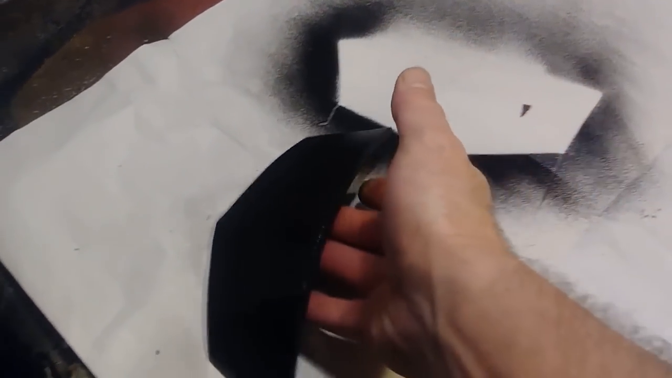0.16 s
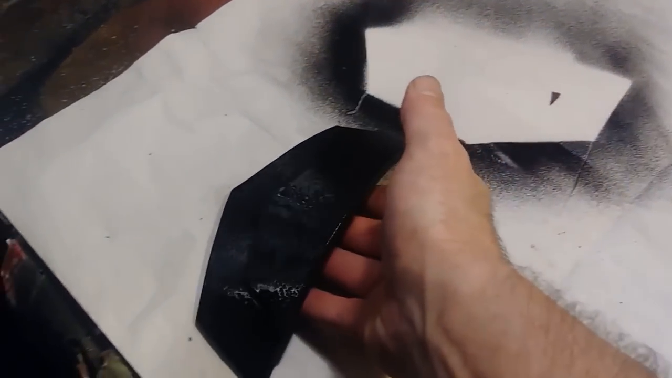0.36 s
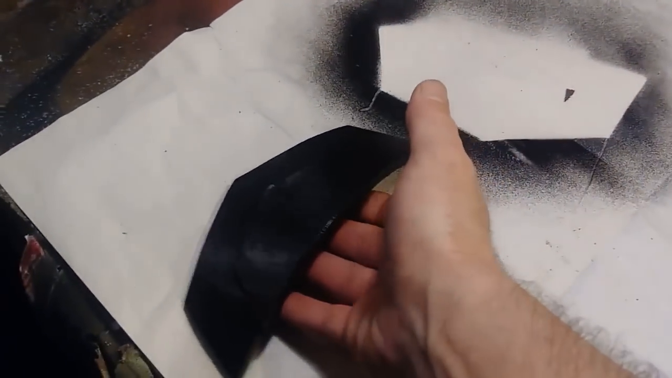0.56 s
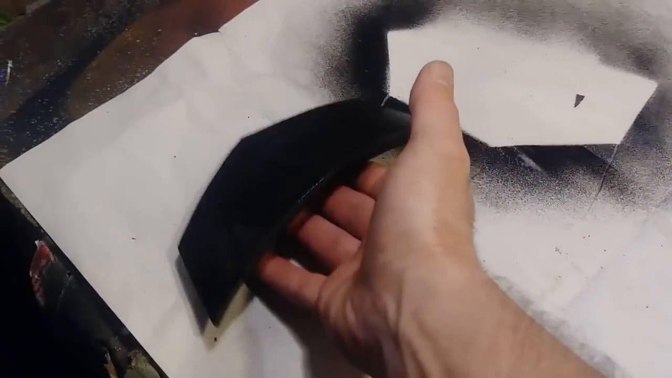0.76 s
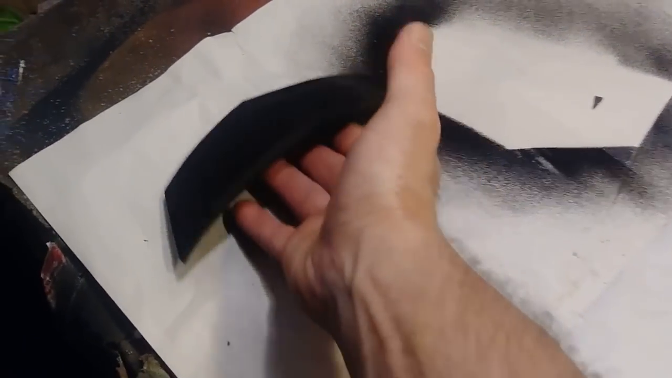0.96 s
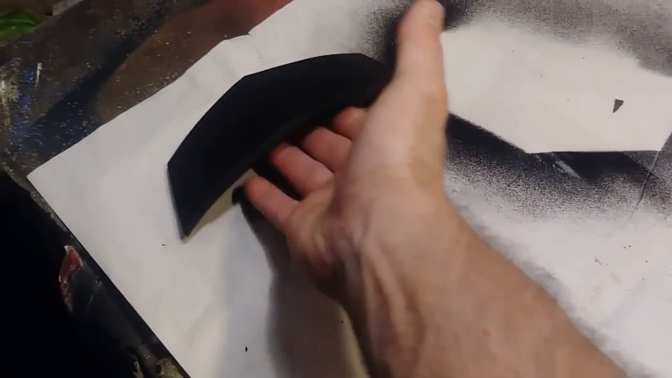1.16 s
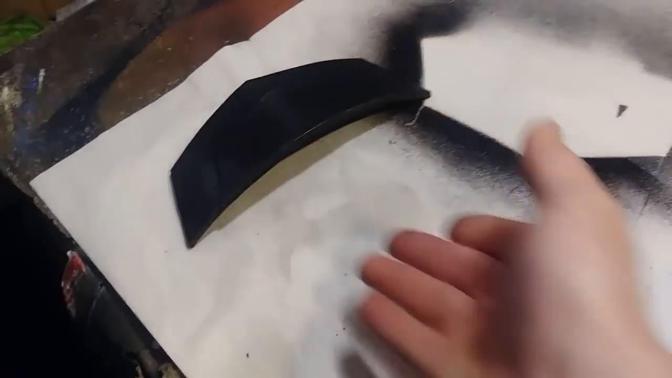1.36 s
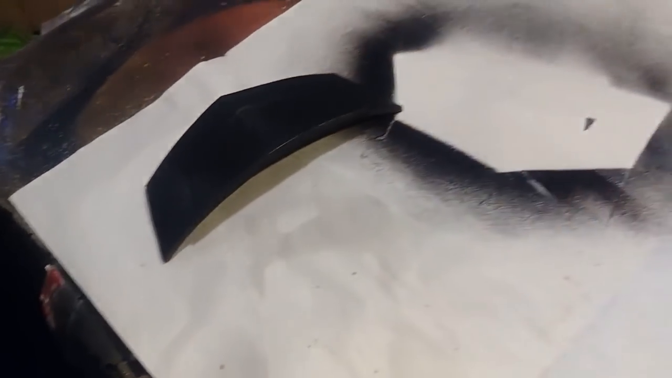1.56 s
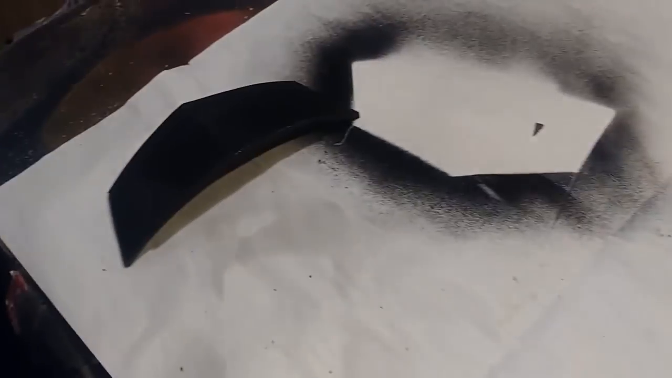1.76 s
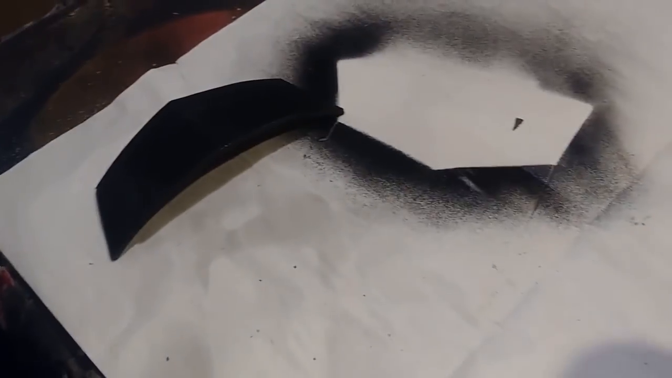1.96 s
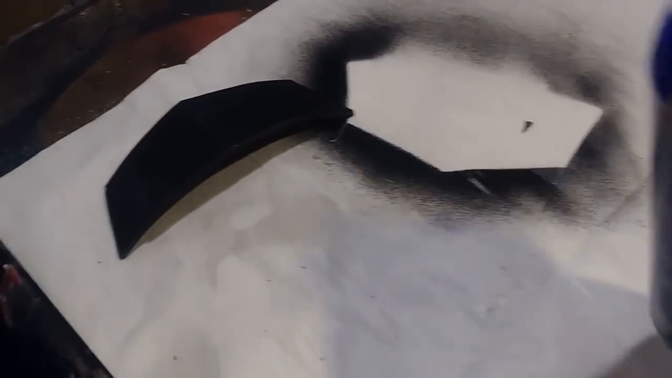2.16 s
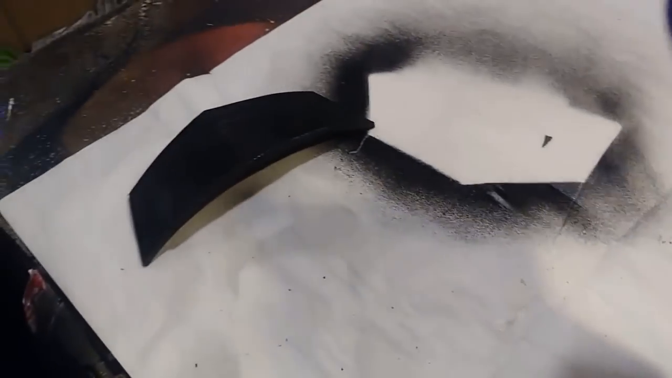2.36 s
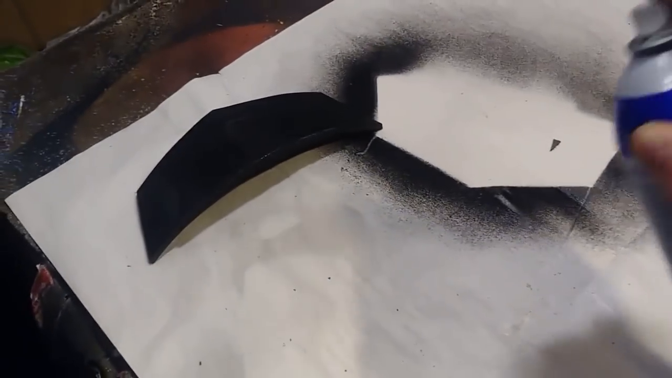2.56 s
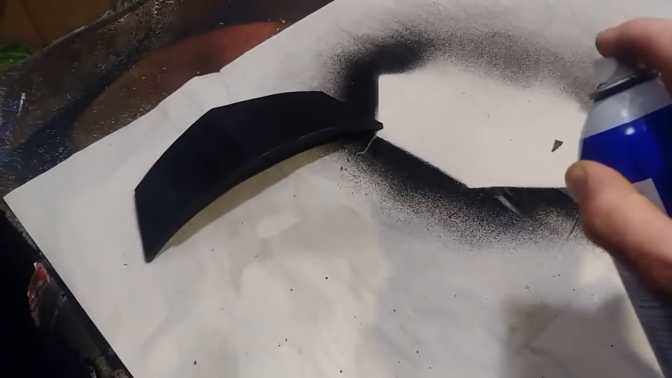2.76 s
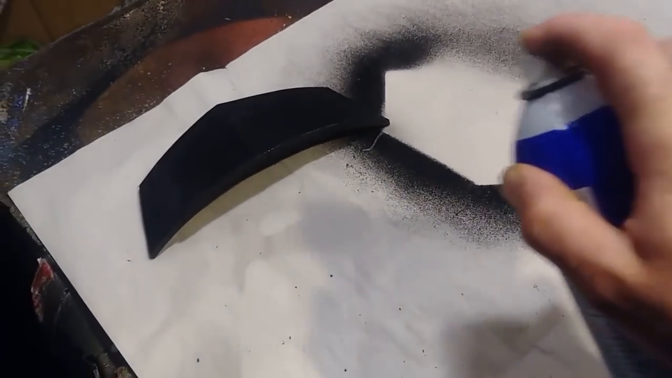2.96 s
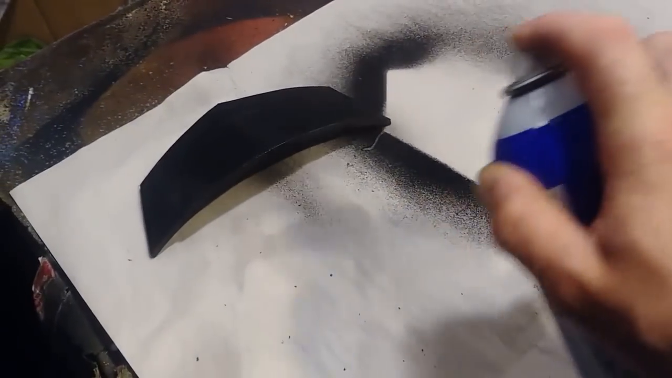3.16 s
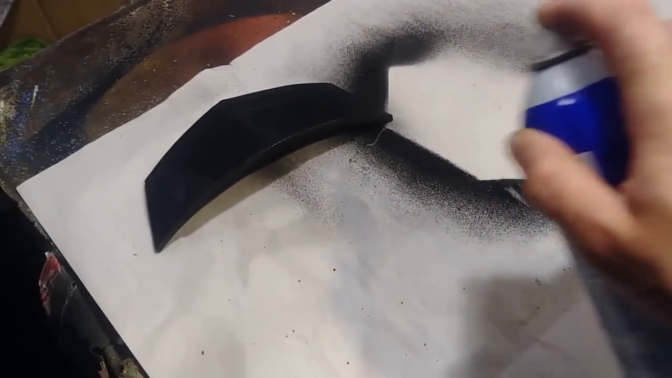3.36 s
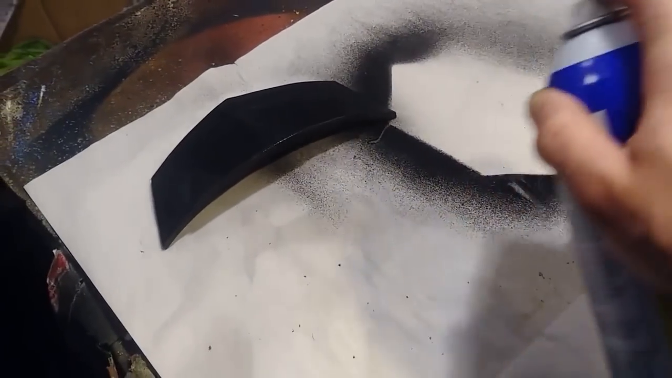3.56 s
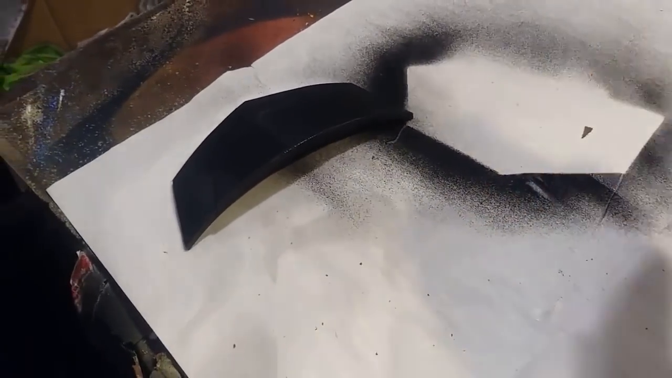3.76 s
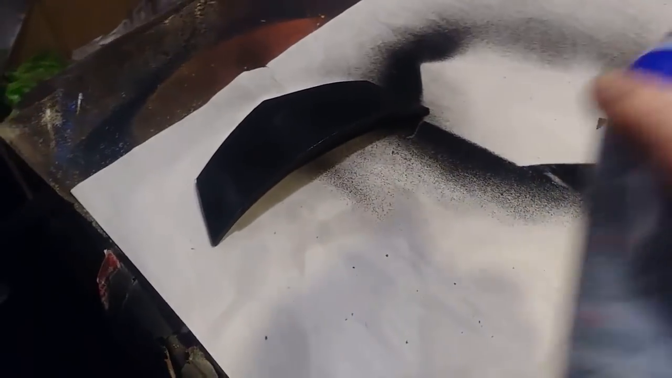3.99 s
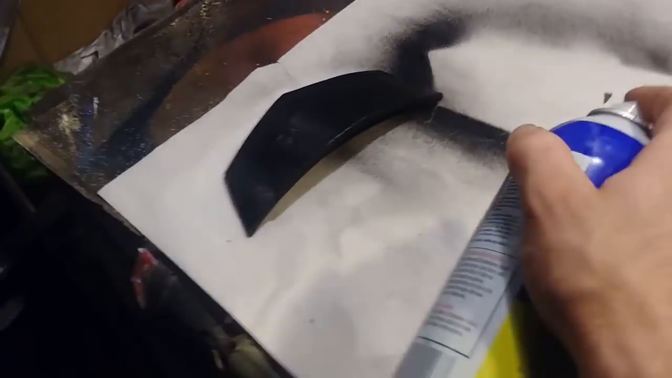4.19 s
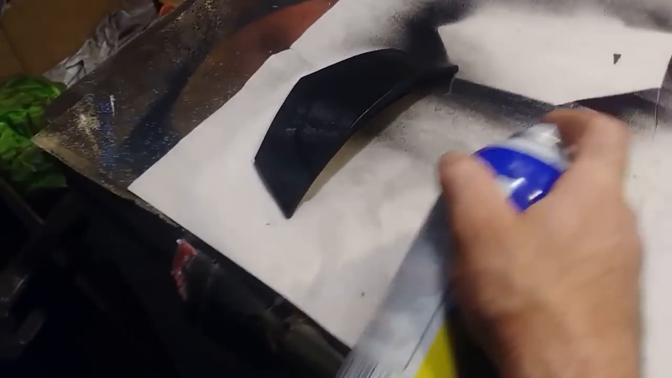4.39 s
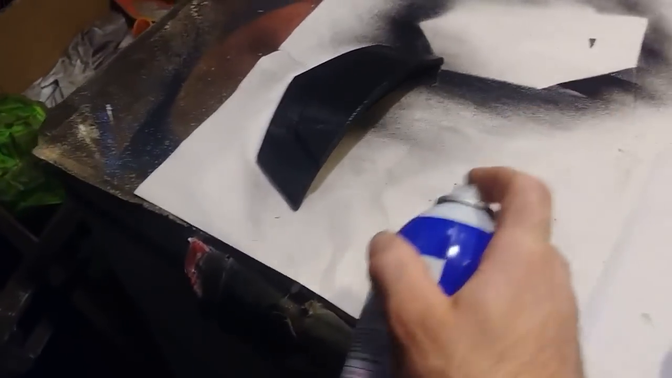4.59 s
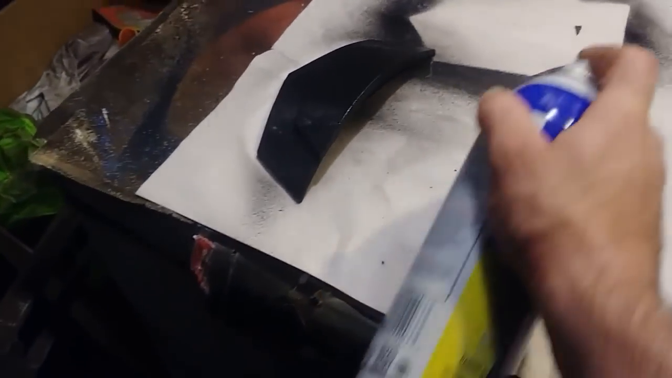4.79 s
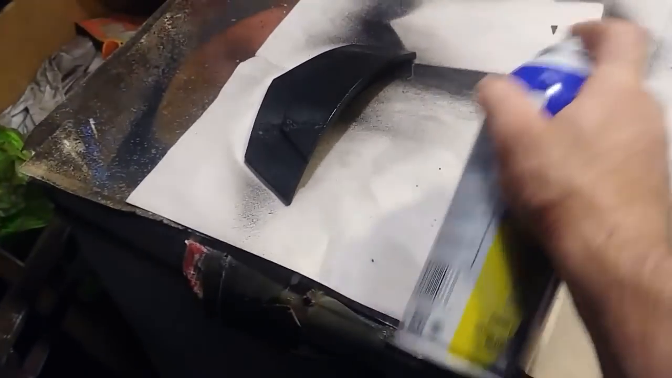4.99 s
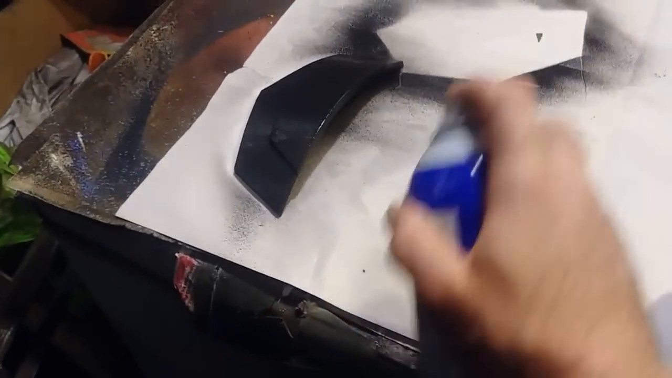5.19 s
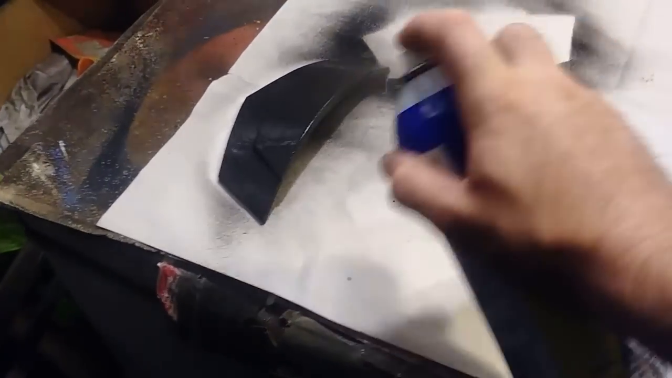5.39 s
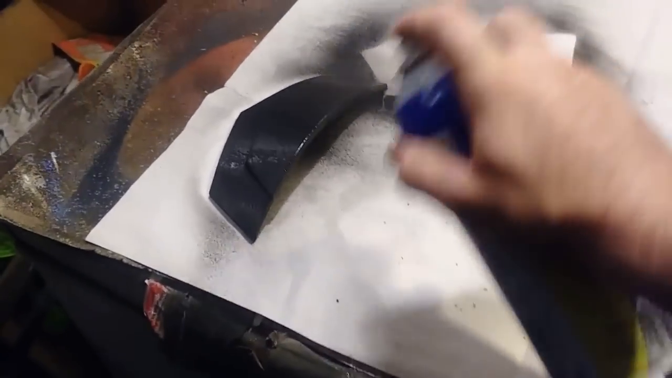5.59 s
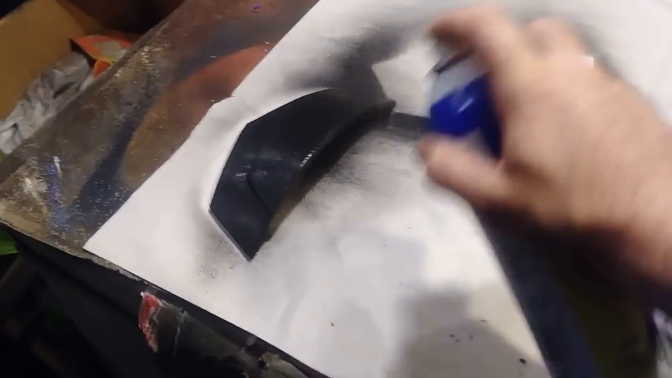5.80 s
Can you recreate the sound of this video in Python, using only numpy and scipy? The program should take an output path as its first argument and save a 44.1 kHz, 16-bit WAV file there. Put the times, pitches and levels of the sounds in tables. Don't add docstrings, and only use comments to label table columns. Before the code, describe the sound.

Foam piece rubs and settles on paper, a spray can is picked up, hisses in two bursts, its mixing ball clacking loudly between and during them.

```python
import sys
import numpy as np
from scipy import signal
from scipy.fft import rfft, irfft
from scipy.io import wavfile
from scipy.ndimage import uniform_filter1d

SR = 44100
rng = np.random.default_rng(int(sys.argv[2]) if len(sys.argv) > 2 else 0)


def waveform_to_disk(signal):
    frames = np.transpose(np.atleast_2d(signal))
    scaled = np.clip(frames, -1, 1) * 32767
    samples = np.round(scaled).astype(np.int16)
    wavfile.write(sys.argv[1], SR, samples)


def magnitude_from_level(level_db):
    exponent = np.asarray(level_db, float) / 20
    return 10 ** exponent


N = 257544
FRAME, HOP = 512, 128
HZ = np.fft.rfftfreq(FRAME, 1 / SR)[:, None]


def evened(x):
    return x / np.sqrt(np.mean(abs(x) ** 2) + 1e-20)


def evened_level(db):
    return np.sqrt(np.mean(magnitude_from_level(db) ** 2))


def read(points, hz):
    f, value = np.transpose(points)
    return np.interp(np.log(hz + 1), np.log(f + 1), value)


def add(mix, s, sound):
    part = mix[round(s * SR):][:len(sound)]
    part += sound[:len(part)]


def resonate(x, hz, width):
    r = np.exp(-np.pi * width / SR + 2j * np.pi * hz / SR)
    return 2 * signal.lfilter([1 - abs(r)], [1, -r], x).real


def controls(rows):
    s, *columns = np.transpose(rows)
    t = np.arange(s[0], s[-1] + HOP / SR, HOP / SR)
    return s[0], [np.interp(t, s, c) for c in columns]


def shaped(source, gain):
    z = signal.stft(source, nperseg=FRAME, noverlap=FRAME - HOP)[2][:, :gain.shape[1]]
    return signal.istft(z * gain, nperseg=FRAME, noverlap=FRAME - HOP)[1]


def patches(frames, wide, long):
    field = rng.standard_normal((frames, len(HZ))).T
    return evened(uniform_filter1d(uniform_filter1d(field, wide, 0), long, 1))


def shelf(hz, octaves):
    return .5 + .5 * np.tanh(np.log2((HZ + 1) / hz) / octaves)


def bump(hz, width):
    return 1 / (1 + ((HZ - hz) / width) ** 2)


def grainy(n, per_s, spread_db, share):
    size = magnitude_from_level(spread_db * np.minimum(rng.exponential(1, n), 4))
    clicks = size * (rng.random(n) < per_s / SR) * rng.choice([-1, 1], n)
    return evened((1 - share) * rng.standard_normal(n) + share * evened(clicks))


def burst(t60, edge):
    t = np.arange(round(.3 * SR)) / SR
    return (rng.standard_normal(len(t)) + edge * (t == 0)) * magnitude_from_level(-60 * t / t60)


def valve_press(opened, shut, away_db, hand):
    after_s = 0.74
    t = np.arange(opened, min(shut + after_s, N / SR + .03), .004)
    s, flow_db, turn = np.transpose(hand)
    turn = np.interp(t, s, turn)
    closed = np.clip((t - shut) / 0.031, 0, 1)
    after = np.maximum(t - shut, 0)
    flow_db = np.interp(t, s, flow_db) - 14 * np.clip(1 - (t - opened) / .028, 0, 1)
    flow_db = flow_db - 13 * closed - 3 * after - 64 * after ** 2
    fizz_db = -12 + 16 * turn - 8 * closed - 36 * after
    reach_s = 0.42
    away = np.clip(2 - 2 * (t - opened) / reach_s, 0, 1)
    roar_db = -14.5 - turn + 8 * closed + away_db * away
    nozzle_hz = 4640 - 170 * (t - opened)
    return np.transpose([t, flow_db, fizz_db, roar_db, nozzle_hz])


def jet(rows, can_db, flutter_db):
    # pitch_hz, level_db (per Hz)
    jet_colour = [(150, -43), (250, -30.5), (319, -33.5), (451, -14.5), (1000, -11), (2120, -3.5),
                  (2390, -6), (2750, -3), (4400, -3), (6110, -16), (7530, -14.5), (12000, -26),
                  (15100, -25.5), (15900, -26)]
    # time_s, delay_ms
    detour = [(2.9, 0.57), (3.2, 0.94), (3.5, 1), (3.75, 0.55), (4.3, 0.57), (4.55, 0.52), (5.1, 0.53),
              (5.45, 0.6), (5.84, 0.7)]
    s, (flow_db, fizz_db, roar_db, nozzle_hz) = controls(rows)
    frames = len(flow_db)
    colour_db = read(jet_colour, HZ) + (fizz_db + 9) * shelf(4170, 0.78)
    colour_db = colour_db + (roar_db + 16.5) * (1 - shelf(1760, 0.11))
    colour_db = colour_db + 0.78 * bump(nozzle_hz, 146)
    colour_db = colour_db + can_db * bump(2170, 210) + flutter_db * bump(375, 58)
    colour_db = colour_db + 3.0 * patches(frames, 2, 26) + 0.86 * patches(frames, 120, 3)
    delay = np.interp(s + np.arange(frames) * HOP / SR, *np.transpose(detour)) / 1000
    near_echo = .2 * np.exp(2j * np.pi * HZ * delay)
    far_echo = .25 * np.exp(2j * np.pi * HZ * (delay + .0023))
    gain = magnitude_from_level(colour_db) * abs(1 + near_echo + far_echo) / evened_level(read(jet_colour, HZ))
    droplets = grainy(frames * HOP, 6000, 0.8, 0.45)
    hiss = shaped(droplets, gain)
    flow = magnitude_from_level(np.interp(np.arange(len(hiss)) / HOP, np.arange(frames), flow_db))
    return s, hiss * flow * signal.windows.tukey(len(hiss), .006)


def spray_bursts(mix):
    # open_s, shut_s, can_ring_db, paper_flutter_db, roar_before_paper_db
    presses = [
        (2.886, 3.778, 4, -2.5, 0.5),
        (4.289, 5.9, 7.5, 12.5, -3.5),
    ]
    # time_s, valve_flow_db, nozzle_turn (-1..1, to the microphone)
    hands = [
        [(2.9, -38, 0.38), (2.96, -36, 0.23), (3.13, -37, 0.12), (3.17, -37, 0.64), (3.4, -35.5, 0.26),
         (3.56, -35.5, 0.33), (3.77, -37, 0.33)],
        [(4.3, -40.5, 0.49), (4.38, -38, 0.45), (4.53, -42, .9), (4.62, -36.5, 0.21), (4.72, -38, 0.43),
         (4.95, -40, 0.57), (5.25, -41, 0.72), (5.45, -39, 0.31), (5.84, -38, 0.54)],
    ]
    for (opened, shut, can_db, flutter_db, away_db), hand in zip(presses, hands):
        add(mix, *jet(valve_press(opened, shut, away_db, hand), can_db, flutter_db))


def nozzle_whistles(mix):
    # start_s, length_s, pitch_hz, level_db
    whistles = [
        (2.9, 0.064, 4450, -33),
        (3.15, 0.046, 4050, -35.5),
        (3.2, 0.038, 3800, -43),
    ]
    for s, length, hz, db in whistles:
        n = round(length * SR)
        tone = evened(resonate(rng.standard_normal(n), hz, 70))
        add(mix, s, magnitude_from_level(db) * tone * np.hanning(n))


def clack(s, db, hz, low_db, high_db, t60, crack_t60, rattle_db):
    # pitch_hz, level_db (per Hz)
    crack_colour = [(120, -11), (200, -14.5), (531, -8.5), (1020, 0), (1540, -3), (2280, -3.5),
                    (5740, -19.5), (7560, -92), (9600, -14.5), (12000, -83), (15600, -78), (22000, -120)]
    # pitch_multiple, width_hz, level_db
    low_ring = [(0.878, 117, -6.5), (1.002, 78, -1), (1.2, 200, -2)]
    # pitch_hz, width_hz, level_db
    high_ring = [(3470, 336, -1.5), (4600, 690, -1.5), (6160, 190, -18.5), (7820, 480, -18.5)]
    colour_db = 2 * read(crack_colour, HZ) + (high_db - 14) * shelf(6200, .2) - 22 * (1 - shelf(1050, .4))
    taps = signal.minimum_phase(signal.firwin2(511, HZ[:, 0], magnitude_from_level(colour_db)[:, 0], fs=SR))
    hit = burst(crack_t60, edge=9) + magnitude_from_level(rattle_db) * burst(t60, edge=9)
    crack = np.convolve(hit, taps)[:-len(taps) + 1]
    sound = crack / abs(crack).max()
    modes = [(k * hz, w, d + low_db) for k, w, d in low_ring]
    modes += [(f, w, d + high_db) for f, w, d in high_ring]
    for f, width, mode_db in modes:
        ring = burst(t60, edge=20.3)
        for spread in (1, 4, 8):
            ring = resonate(ring, f, spread * width)
        sound = sound + magnitude_from_level(mode_db) * ring / abs(ring).max()
    return s + .0007, magnitude_from_level(db) * sound


def ball_clacks(mix):
    # start_s, peak_db, low_ring_hz, low_ring_db, high_ring_db
    loose = [(2.286, -43, 2170, -9.5, -31), (2.3212, -29.5, 2020, -9.5, -7.5), (2.34, -32, 2280, -17, -30),
             (2.4318, -47, 2180, -26, -2.5), (2.5575, -22.5, 2140, -12.5, -13.5),
             (2.5975, -41, 2130, -19, -35), (3.8992, -38.5, 2150, -1.5, -3),
             (4.1938, -37.5, 2200, -6.5, -51), (4.2444, -83, 2090, -3, -27)]
    # start_s, peak_db, low_ring_hz, low_ring_db, high_ring_db
    swung = [(4.584, -30.5, 2180, -0.5, -2), (4.6044, -11, 2315, -13.5, -7),
             (5.2616, -4.5, 2290, -6.5, -3.5), (5.3352, -22.5, 1850, -4.5, -16),
             (5.365, -41, 2170, -13, -12), (5.4501, -24, 2060, 7, 6), (5.4658, -19, 1825, -5, -1.5),
             (5.4791, -11, 1855, -13.5, -7), (5.544, -6.5, 2286, -6.5, -2.5),
             (5.5743, -19.5, 2070, -4, -26), (5.6309, -9, 1996, -2.5, -6), (5.6878, -13, 1870, -6.5, -6),
             (5.7157, -11.5, 2063, -9, -8.5), (5.791, -9.5, 2220, -8, -1.5), (5.82, -10.5, 1920, -4, -12)]
    for row in loose:
        add(mix, *clack(*row, t60=.238, crack_t60=.03, rattle_db=1))
    for row in swung:
        add(mix, *clack(*row, t60=.073, crack_t60=.014, rattle_db=-17))


def ball_rolls(mix):
    # peak_s, level_db, pitch_hz
    rolls = [(2.232, -62, 2180), (2.326, -31.5, 2150), (2.4, -61, 2060), (2.5, -45.5, 1990),
             (2.59, -50, 2110), (2.66, -51, 2110), (2.771, -48, 1910)]
    rise_s, fall_s, ends_db = .02, 0.12, -24
    for at, peak_db, hz in rolls:
        swell = [(at - rise_s, peak_db + ends_db / 2), (at, peak_db), (at + fall_s, peak_db + ends_db)]
        s, (db,) = controls(swell)
        gain = magnitude_from_level(db + 12.5) * bump(hz, 160) ** 2 * signal.windows.tukey(len(db), .2)
        add(mix, s, shaped(grainy(len(db) * HOP, 630, 3., 0.53), gain))


def stroke(s, length, db, bright_db, dull_db):
    end, lift_s, settle_s = s + length, 0.006, 0.167
    shape = [(s, -11), (s + .3 * length, 0), (end, 0), (end + lift_s, -8), (end + lift_s + settle_s, -37)]
    return [(t, db + d, bright_db, dull_db) for t, d in shape]


def rub(rows):
    # pitch_hz, level_db (per Hz)
    paper_colour = [(180, -65), (300, -108), (457, 12), (719, -15), (1050, 4), (1400, -9.5), (2000, -16),
                    (4730, -19), (8910, -39.5), (11000, -62), (14300, -77), (22000, -120)]
    s, (rub_db, bright_db, dull_db) = controls(rows)
    frames = len(rub_db)
    colour_db = read(paper_colour, HZ) + (bright_db - 2.5) * shelf(3760, 0.38)
    colour_db = colour_db + np.minimum(dull_db, -6) * (1 - shelf(1394, 1.0))
    blob_db = min(frames / 90, 1) ** 2 * 7.2
    colour_db = colour_db + blob_db * patches(frames, 2, 18) + 2.8 * patches(frames, 150, 2)
    gain = magnitude_from_level(colour_db + rub_db) / evened_level(read(paper_colour, HZ))
    gain = gain * signal.windows.tukey(frames, .08)
    return s, shaped(grainy(frames * HOP, 1500, 4.1, 0.46), gain)


def foam_strokes(mix):
    # start_s, length_s, rubbing_db, brightness_db, dull_body_db
    strokes = [(0, 0.17, -63.5, 11.5, 2), (0.159, 0.17, -46, -4, -30), (0.243, 0.12, -40.5, -5.5, -35),
               (0.429, .16, -62.5, 12, -14.5), (0.618, 0.037, -45.5, -17, -62),
               (.69, 0.039, -73, 19.5, -14), (0.928, 0.13, -46, 1.5, -53), (1.203, 0.07, -40.5, -20, -53),
               (1.312, 0.12, -30.5, -9.5, -31.5), (1.993, 0.027, -43, -13, -5),
               (2.033, 0.017, -25.5, -22, -39), (2.083, 0.047, -39, -12, -32)]
    for row in strokes:
        add(mix, *rub(stroke(*row)))


def snap(s, db, hz, t60):
    sound = resonate(resonate(burst(t60, edge=5), hz, 1.2 * hz), hz, 2.5 * hz)
    band = signal.butter(5, (.3 * hz, 5600), "band", fs=SR, output="sos")
    sound = signal.sosfilt(band, sound)
    return s, magnitude_from_level(db) * sound / abs(sound).max()


def paper_and_table_hits(mix):
    # start_s, peak_db, colour_hz,
    # t60_s
    snaps = [(0.328, -45, 4600, 0.021), (0.362, -65, 3110, 0.022), (0.627, -48.5, 2990, 0.031),
             (0.984, -54, 3520, 0.028), (1.049, -48, 4850, 0.027), (1.316, -48, 2450, 0.029),
             (1.338, -41, 2020, 0.087), (1.372, -28.5, 2270, 0.045), (1.431, -34.5, 2500, 0.03),
             (2.009, -33, 1480, 0.03), (2.043, -27.5, 2010, 0.044), (2.112, -38, 1110, 0.066),
             (2.201, -48.5, 1190, 0.016), (2.551, -38.5, 1280, 0.06), (2.881, -38.5, 1260, 0.018),
             (4.19, -48, 1290, .06),
             (1.9815, -40, 2400, .014),
        (1.9876, -24, 1600, .02),
    ]
    for row in snaps:
        add(mix, *snap(*row))
    add(mix, *snap(0, db=-44, hz=400, t60=.12))


def room(x):
    # pitch_hz, t60_s
    decay = [(300, 1), (2000, 0.35), (8000, 0.1)]
    taps = np.zeros(SR // 2)
    at = np.arange(200, len(taps) - 20, 20)
    taps[at + rng.integers(0, 20, len(at))] = rng.choice([-1., 1.], len(at))
    hz, t, z = signal.stft(taps, SR, nperseg=256)
    tail = signal.istft(z * magnitude_from_level(-60 * t / read(decay, hz)[:, None]), SR, nperseg=256)[1]
    return signal.fftconvolve(x, tail / np.linalg.norm(tail))[:N]


def gated(x):
    threshold_db, depth_db = -90.5, 39
    z = signal.stft(x, nperseg=FRAME, noverlap=FRAME - HOP)[2]
    power_db = 10 * np.log10(signal.lfilter([.12], [1, .12 - 1], abs(z) ** 2) + 1e-20)
    tilt_db = 4.5 * np.log2(HZ / 2000 + 0.12)
    shut = .5 - .5 * np.tanh((power_db - threshold_db + tilt_db) / 2.0)
    return signal.istft(z * magnitude_from_level(-depth_db * shut), nperseg=FRAME, noverlap=FRAME - HOP)[1][:N]


def coloured_noise(points):
    hz = np.fft.rfftfreq(N, 1 / SR)
    return evened(irfft(rfft(rng.standard_normal(N)) * magnitude_from_level(read(points, hz)), N))


def room_tone():
    # pitch_hz, level_db (per Hz)
    rumble = [(15, -69), (25, -36), (45, -20), (91, -19.5), (103, -11), (124, -2), (156, -12), (173, -17),
              (231, -25), (300, -33), (390, -84), (660, -120)]
    # pitch_hz, level_db (per Hz)
    faint_hiss = [(200, -26), (300, 1), (1200, 2), (2000, -2), (4500, -5), (6500, -11), (12000, -16),
                  (16000, -28)]
    # pitch_hz, width_hz, level_db
    hum = [(110.5, 5.6, -76), (157, 5, -82)]
    t = np.arange(N) / SR
    tone = magnitude_from_level(-64.5) * coloured_noise(rumble) + magnitude_from_level(-79) * coloured_noise(faint_hiss)
    for hz, width, db in hum:
        waver = evened(resonate(resonate(rng.standard_normal(N), hz, width), hz, width))
        tone = tone + magnitude_from_level(db) * (np.sin(2 * np.pi * hz * t) + 0.42 * waver)
    return tone


def scene():
    steady, hits = np.zeros(N), np.zeros(N)
    spray_bursts(steady)
    nozzle_whistles(steady)
    ball_clacks(hits)
    ball_rolls(steady)
    foam_strokes(steady)
    paper_and_table_hits(hits)
    low_cut = signal.butter(3, 260, "high", fs=SR, output="sos")
    near = signal.sosfilt(low_cut, steady + hits + magnitude_from_level(-14) * room(hits))
    return np.tile(gated(near) + room_tone(), (2, 1))


def low_pass(x):
    return signal.sosfilt(signal.butter(12, 17060, fs=SR, output="sos"), x)


def record(dry):
    limit = signal.firwin(401, 15950, window=("kaiser", 9), fs=SR)
    mix = signal.oaconvolve(dry, limit[None], "same")
    return low_pass(mix)


dry = scene()
out = record(dry)
waveform_to_disk(out)
```